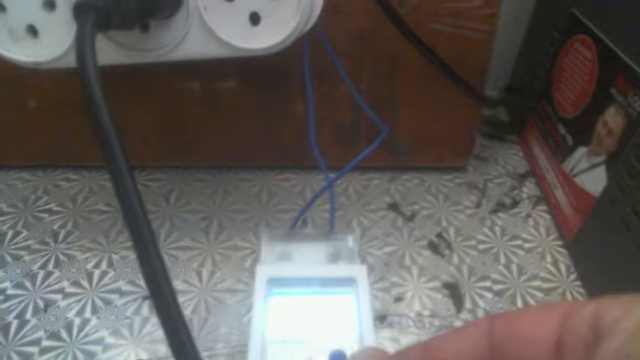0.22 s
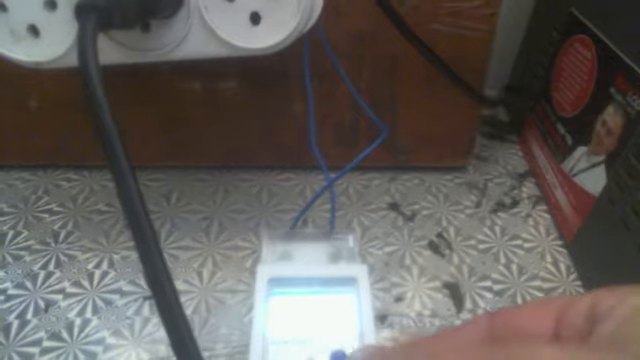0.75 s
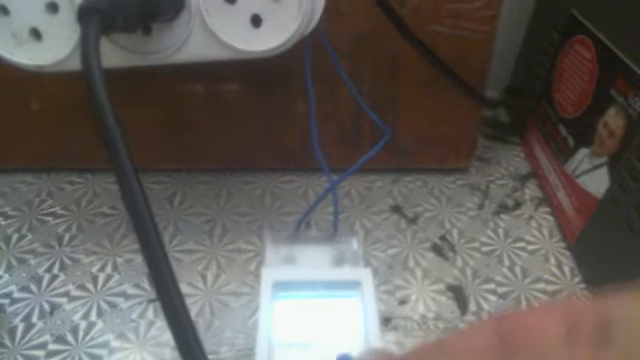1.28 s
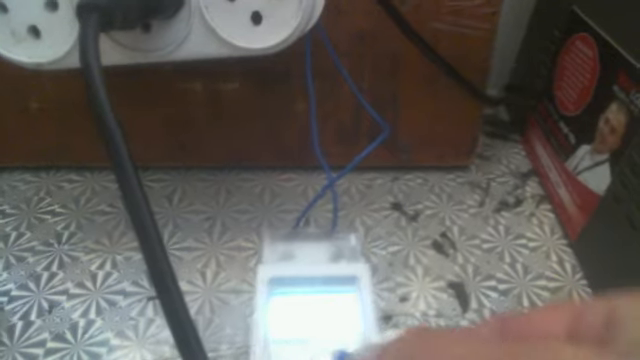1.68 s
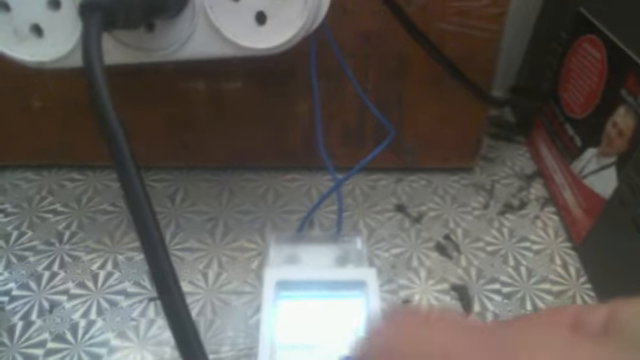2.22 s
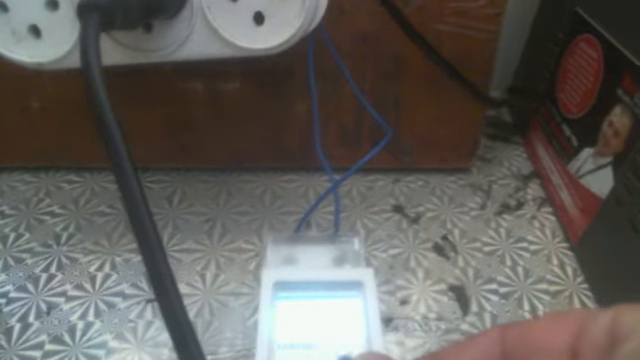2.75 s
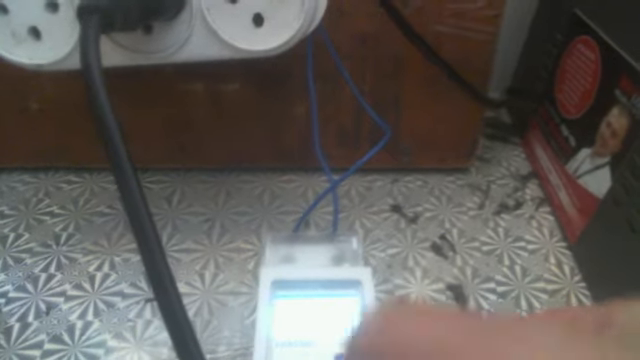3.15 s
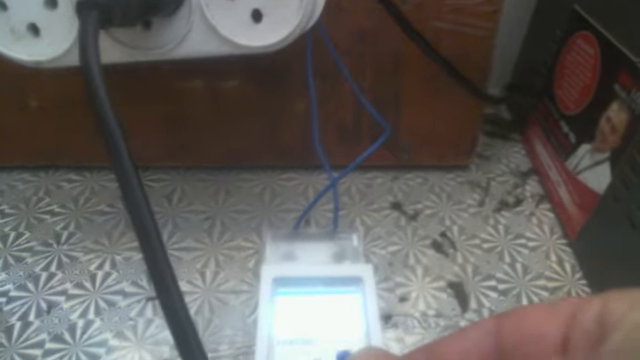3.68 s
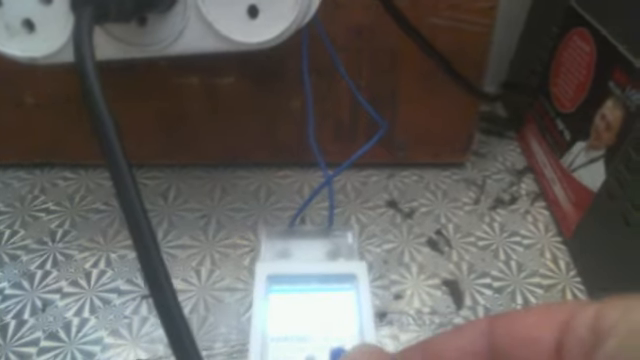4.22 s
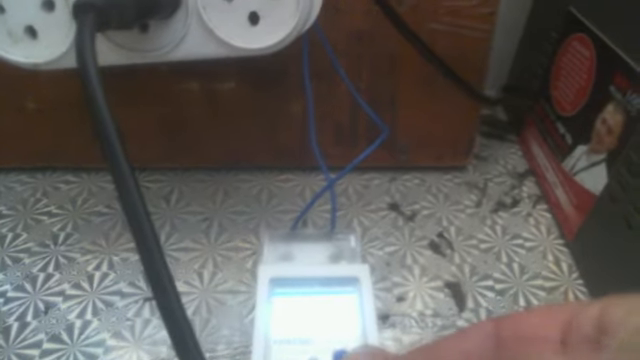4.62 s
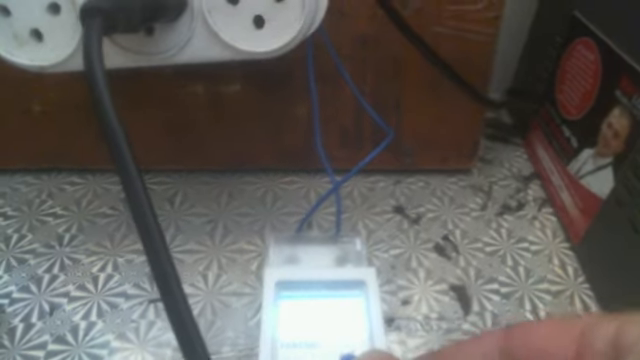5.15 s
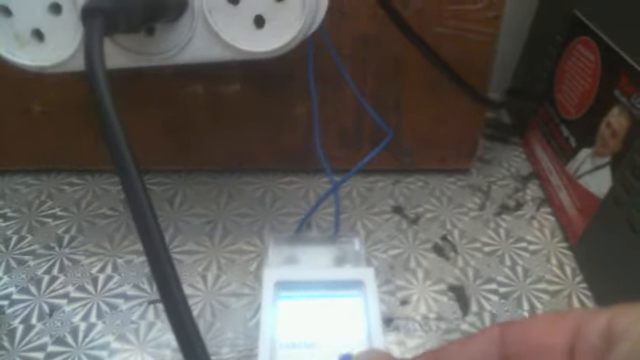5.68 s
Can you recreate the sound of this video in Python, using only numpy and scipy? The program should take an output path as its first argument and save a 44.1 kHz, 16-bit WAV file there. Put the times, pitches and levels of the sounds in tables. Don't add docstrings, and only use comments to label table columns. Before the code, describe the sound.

A finger presses a plastic button four times with sharp paired clicks, over faint mains hum, fan rush and hiss in a small room.

```python
import sys
import numpy as np
from scipy import signal
from scipy.fft import rfft, irfft, next_fast_len
from scipy.io import wavfile
from scipy.ndimage import uniform_filter1d, map_coordinates

SR = 44100
rng = np.random.default_rng(int(sys.argv[2]) if len(sys.argv) > 2 else 0)


def materialize(psi):
    bounded = np.clip(np.atleast_2d(psi).T, -1, 1)
    quanta = np.round(bounded * 32767).astype(np.int16)
    wavfile.write(sys.argv[1], SR, quanta)


def ratio_of_db(decibels):
    return 10 ** (np.asarray(decibels, float) / 20)


N = 257852
T = np.arange(N) / SR

# start_s, level_db (peak), knock_db, rattle_db
PRESSES = [
    (2.1943, -12.5, -29, -19.5),
    (3.2045, -11.5, -29.5, -21),
    (4.0312, -13, -29, -19),
    (4.8488, -12.5, -31.5, -19.5),
]
# start_s, level_db (peak), knock_db, rattle_db
RELEASES = [
    (2.4407, -15.5, -23.5, -23.5),
    (3.421, -13.5, -25.5, -26),
    (4.227, -13.5, -24, -26.5),
    (5.0643, -13, -24.5, -26.5),
]
# pitch_hz, level_db, t60_s
PRESS_MODES = [(2350, -14.5, 0.024), (2750, -16.5, 0.044), (3290, -11.5, 0.024), (3485, -15.5, 0.042),
               (3810, -8, 0.026), (4416, -13.5, 0.017), (4590, -19, 0.021), (5020, -13, 0.02),
               (6420, 4.5, 0.0085), (7440, -6, 0.0086), (8400, -4, 0.0095), (9970, -17.5, 0.014),
               (11980, -20, 0.024), (13900, -25, .015)]
# pitch_hz, level_db, t60_s
RELEASE_MODES = [(2050, -14, 0.035), (2326, -5.5, 0.043), (2726, -12.5, 0.054), (3450, -13, 0.045),
                 (3863, 0.5, 0.049), (4280, -11.5, 0.038), (4890, -12.5, 0.038), (6340, -7, 0.034),
                 (8050, -27, 0.024), (8570, -9.5, 0.034), (9310, -20, .02), (11750, -31, 0.016),
                 (13700, -29, .012)]
# pitch_hz, level_db, t60_s
PRESS_KNOCK = [(202, -4, 0.048), (423, -0.5, 0.031), (554, -0.5, 0.033), (715, -0.5, 0.034),
               (1105, 3, 0.025), (1196, -18, .03)]
# pitch_hz, level_db, t60_s
RELEASE_KNOCK = [(517, -9, 0.071), (680, 1.5, 0.02), (1035, -4, 0.033), (1423, -9, 0.11),
                 (1560, -20, 0.013)]
# pitch_hz, density_db (per Hz)
PRESS_RATTLE = [(1750, -25), (2100, -1), (2500, -7), (3600, 2), (4900, -2.5), (5700, -12.5), (7000, -9),
                (9000, -12), (11000, -16), (13800, -14), (16500, -35)]
# pitch_hz, density_db (per Hz)
RELEASE_RATTLE = [(1100, -31), (1700, -2), (3000, -4.5), (4500, -7), (5600, -7.5), (6600, -10), (8600, -5),
                  (10000, -20), (13800, -17), (15000, -28), (16500, -36)]


def button():
    down = snaps(PRESSES, PRESS_MODES, PRESS_KNOCK, PRESS_RATTLE, free_s=0.0058, lead_s=0.00073, rise_s=0.0011,
                 rattle_gain_db=14, near_db=-7, wet_db=-15)
    up = snaps(RELEASES, RELEASE_MODES, RELEASE_KNOCK, RELEASE_RATTLE, free_s=0.0053, lead_s=0.0015,
               rise_s=0.0019, rattle_gain_db=20, near_db=-2, wet_db=-13.5)
    return down + up


# pitch_hz, t60_s
NEARBY = [(1000, 0.075), (3000, 0.024), (6500, 0.022), (9000, 0.01), (14000, 0.027)]
# pitch_hz, t60_s
ROOM = [(300, 0.53), (1500, 0.33), (4000, 0.2), (9000, 0.17), (15000, 0.2)]


def snaps(events, modes, knock_modes, rattle_colour, free_s, lead_s, rise_s, rattle_gain_db, near_db, wet_db):
    track = np.zeros(N + SR)
    t = np.arange(SR // 5) / SR
    habit = rng.random((len(modes), 1))
    seated = 1 / (1 + np.exp(-np.clip((t - free_s) / 0.0004, -50, 50)))
    choke = ratio_of_db(-22 * seated)
    shaking = noise(rattle_colour)
    usual_rattle = burst(shaking, 0, rise_s, t60=0.016)
    nearby = tail(NEARBY, gap_s=0.0032)
    for start_s, level_db, knock_db, rattle_db in events:
        phase = habit + 0.06 * rng.standard_normal(habit.shape)
        bell = ring(modes, phase, rise_s, scatter_db=1.5) * choke
        fresh_rattle = burst(shaking, start_s, rise_s, t60=0.018)
        rattle = ratio_of_db(rattle_db + rattle_gain_db) * (usual_rattle + 0.45 * fresh_rattle)
        knock = ratio_of_db(knock_db + 2) * ring(knock_modes, 0, 0.00049, scatter_db=3.5)
        direct = ratio_of_db(level_db - 3) * (bell + rattle + knock)
        spread = ratio_of_db(level_db - 3) * (ratio_of_db(-12) * bell + rattle + knock)
        onset_s = start_s - lead_s
        add(track, onset_s, direct)
        add(track, onset_s, ratio_of_db(near_db) * signal.fftconvolve(spread, nearby))
        add(track, onset_s, ratio_of_db(wet_db) * signal.fftconvolve(spread, tail(ROOM, gap_s=0.009)))
    return track[:N]


# start_s, level_db
TOUCHES = [
    (1.534, -62),
    (1.834, -51),
    (2.3975, -46.5),
]
# pitch_hz, level_db, t60_s
TOUCH_MODES = [(2400, 1, 0.008), (3240, -3, 0.0092), (4060, 4, 0.0097)]
# start_s, level_db
THUDS = [
    (1.833, -33),
    (1.875, -42.5),
    (1.891, -58),
    (2.197, -42),
    (5.134, -44.5),
]
# pitch_hz, level_db, t60_s
THUD_MODES = [(207, -0.5, 0.097), (286, 1.5, 0.036), (410, -11, 0.092), (560, -2, 0.032),
              (646, -8.5, 0.021), (770, -28, 0.0073)]


def handling():
    track = np.zeros(N + SR)
    shaking = noise(PRESS_RATTLE)
    for start_s, level_db in TOUCHES:
        phase = rng.random((len(TOUCH_MODES), 1))
        tick = ring(TOUCH_MODES, phase, 0.00053, scatter_db=3)
        rub = ratio_of_db(-1) * burst(shaking, start_s, 0.0006, t60=0.016)
        add(track, start_s, ratio_of_db(level_db) * (tick + rub))
    for start_s, level_db in THUDS:
        bump = ratio_of_db(level_db) * ring(THUD_MODES, 0, 0.00071, scatter_db=1)
        add(track, start_s, bump)
        add(track, start_s, ratio_of_db(-10.5) * signal.fftconvolve(bump, tail(NEARBY, gap_s=0.0054)))
    return track[:N]


# pitch_hz, density_db (per Hz)
SWAY = [(3, -57), (8, 17), (20, -4), (45, -5.5), (90, -44), (200, -66)]
# start_s (peak), level_db, fade_s
GUSTS = [
    (.03, -59, .2),
    (.85, -43.5, 0.42),
    (1.3, -48.5, 0.13),
    (2.64, -54, .15),
    (3.08, -44.5, 0.22),
    (3.55, -48, .2),
    (3.85, -46, 0.17),
    (4.72, -50, 0.11),
    (5.4, -42, 0.19),
]
# start_s, level_db, width_s (first eddy), count
PUFFS = [
    (.8432, -18.5, .0017, 5),
    (1.237, -35, .005, 3),
]
# start_s, level_db, width_s
SHOVES = [(.837, -17.5, 0.013), (.847, -23, .005), (0.935, -26.5, 0.0028), (.998, -24.5, .004),
          (1.053, -23.5, .008), (3.04, -28.5, 0.024), (3.16, -35, 0.0088), (5.375, -38, 0.008),
          (5.451, -31.5, 0.024), (5.557, -26.5, .004), (5.63, -34, .012)]


def air():
    gap_s, gap_scatter, loss_db, later_width_s = 0.0153, 0.11, 1.2, 0.0042
    humps = sum(eddy(*row) for row in SHOVES)
    for start_s, level_db, first_width_s, count in PUFFS:
        late, size = rng.standard_normal((count, 2)).T
        humps += eddy(start_s, level_db, first_width_s)
        for k in range(1, count):
            eddy_s = start_s + gap_s * (k + gap_scatter * late[k])
            eddy_db = level_db - loss_db * k + 1.7 * size[k]
            humps += eddy(eddy_s, eddy_db, later_width_s)
    strength = ratio_of_db(-60)
    for peak_s, level_db, fade_s in GUSTS:
        distance = np.where(T < peak_s, (peak_s - T) / 0.08, (T - peak_s) / fade_s)
        strength = strength + ratio_of_db(level_db) * np.exp(-distance)
    return humps + strength * noise(SWAY)


def eddy(start_s, level_db, width_s):
    core = np.exp(-0.5 * ((T - start_s) / width_s) ** 2)
    skirt = np.exp(-0.5 * ((T - start_s) / (1.9 * width_s)) ** 2)
    return ratio_of_db(level_db) * (core - skirt / 1.95)


# pitch_hz, level_db (rms)
HUM = [(120, -58.7), (150.03, -70), (200.05, -63), (250.07, -60), (275.05, -70), (350.07, -73),
       (500.1, -74)]
# pitch_hz, density_db (per Hz)
FAN = [(60, -3), (110, -3), (200, -0.5), (300, -2), (370, -12), (500, 2), (620, -6.5), (780, -4.5),
       (950, -16.5), (1500, -17), (3000, -39)]


def machines():
    fan_db = -56 + 0.53 * wobble(7.24) + 0.53 * wobble(25)
    return tones(HUM) + ratio_of_db(fan_db) * noise(FAN)


# multiple (of the line rate), level_db (rms)
READOUT = [(1, -68), (2, -77)]
# pitch_hz, level_db (rms)
CLOCKS = [(8001.1, -76), (11375, -88), (12629, -88)]
# pitch_hz, density_db (per Hz)
HISS = [(530, -21), (900, -7.5), (1300, -9), (2000, -6.5), (3000, -8), (3500, -3.5), (4200, -7.5),
        (5500, -9), (6500, -7.5), (8200, -10), (9500, -12.5), (12000, -14), (15600, -13.5), (16500, -18)]


def electronics():
    line_hz, lines_per_frame = 6750.13, 900
    frame = (T * line_hz / lines_per_frame + 0.086) % 1
    reading = uniform_filter1d(1.0 * (frame > 0.17), 90)
    whine = reading * tones([(k * line_hz, level_db) for k, level_db in READOUT])
    clocks = (0.5 + 0.44 * reading) * tones(CLOCKS)
    hiss = ratio_of_db(-62.5 + 0.23 * wobble(5.98)) * noise(HISS)
    return whine + clocks + hiss


def ring(modes, phase, rise_s, scatter_db):
    t = np.arange(SR // 5) / SR
    hz, db, t60 = np.transpose(modes)[:, :, None]
    level = db + scatter_db * rng.standard_normal(db.shape) - 60 * t / t60
    partials = ratio_of_db(level) * np.sin(2 * np.pi * (hz * t + phase))
    return np.sum(partials, 0) * (1 - np.exp(-(t / rise_s) ** 2))


def burst(source, start_s, rise_s, t60):
    t = np.arange(SR // 5) / SR
    envelope = ratio_of_db(-60 * t / t60) * (1 - np.exp(-(t / rise_s) ** 2))
    return envelope * source[round(start_s * SR):][:len(t)]


def tail(decay, gap_s):
    hz, t, z = signal.stft(rng.standard_normal(SR // 3), SR, nperseg=64)
    f, t60 = np.transpose(decay)
    fade = ratio_of_db(-60 * t / np.interp(hz, f, t60)[:, None])
    echoes = signal.istft(z * fade, SR, nperseg=64)[1]
    return np.pad(echoes, (round(gap_s * SR), 0)) / np.linalg.norm(echoes)


def add(track, start_s, sound):
    track[round(start_s * SR):][:len(sound)] += sound


def tones(lines):
    return sum(ratio_of_db(db) * np.sqrt(2) * np.sin(2 * np.pi * (hz * T + rng.random())) for hz, db in lines)


def noise(spectrum):
    m = next_fast_len(N + 8192)
    white = rfft(rng.standard_normal(m))
    x = irfft(white * ratio_of_db(along(spectrum, np.fft.rfftfreq(m, 1 / SR))), m)[:N]
    return x / np.std(x)


def along(points, hz):
    f, v = np.transpose(points)
    return np.interp(np.log(hz + 1), np.log(f + 1), v, left=-120, right=-120)


def wobble(rate_hz):
    return map_coordinates(rng.standard_normal(int(N * rate_hz / SR) + 4), [T * rate_hz])


def scene():
    return (button() + handling() + air() + machines() + electronics())[None]


def roll_off(x):
    return signal.sosfilt(signal.butter(12, 16470, fs=SR, output="sos"), x)


def record(dry):
    band_hz, shelf_db, offset = 15850, -36, -0.0087
    hz = np.fft.rfftfreq(N, 1 / SR)
    shelf = ratio_of_db(shelf_db) * (hz < band_hz + 700)
    band = np.where(hz < band_hz, 1, shelf)
    mix = irfft(rfft(dry) * band, N) + offset
    return roll_off(mix)


dry = scene()
out = record(dry)
materialize(out)
```